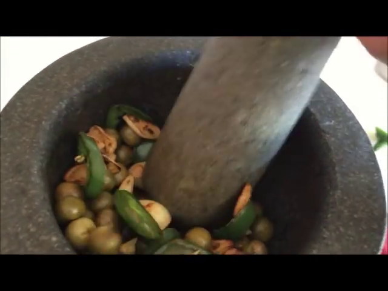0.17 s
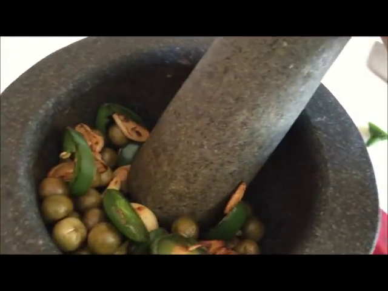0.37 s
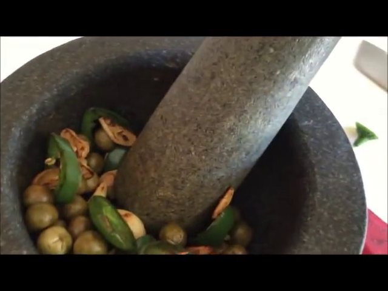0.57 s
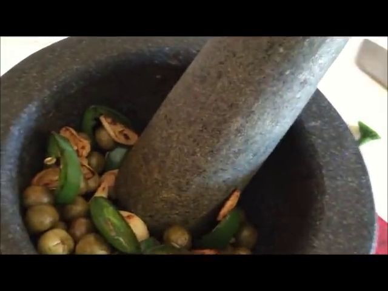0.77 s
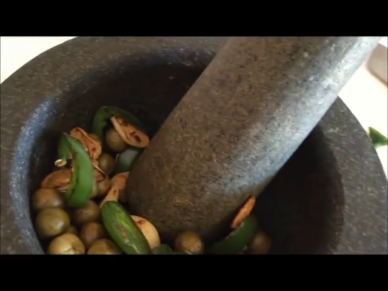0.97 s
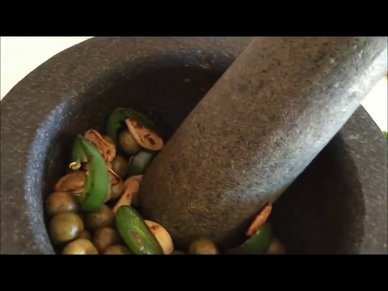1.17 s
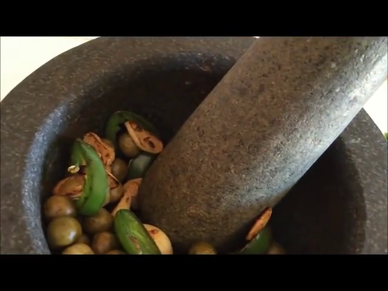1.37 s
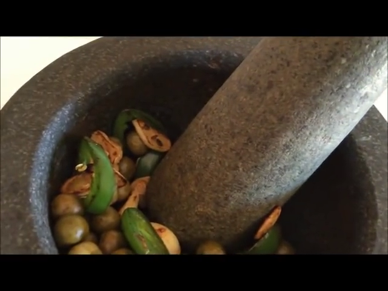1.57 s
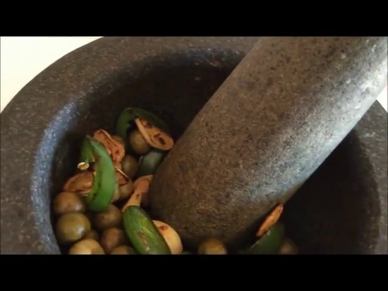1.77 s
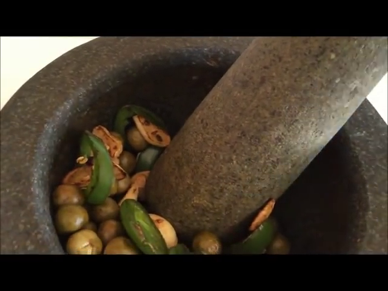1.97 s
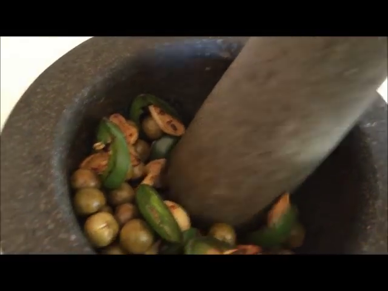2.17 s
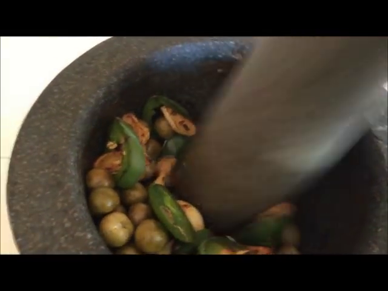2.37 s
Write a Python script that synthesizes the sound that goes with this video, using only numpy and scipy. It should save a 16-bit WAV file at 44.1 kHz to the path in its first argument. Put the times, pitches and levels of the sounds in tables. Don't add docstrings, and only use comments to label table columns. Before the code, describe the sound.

Stone pestle pounding in a mortar: crunching burst, sharp stone knock, quiet pause, faint wet scrape

```python
import sys
import numpy as np
from scipy import signal
from scipy.io import wavfile

SR = 44100
rng = np.random.default_rng(int(sys.argv[2]) if len(sys.argv) > 2 else 0)


def level_to_linear(level):
    exponent = np.asarray(level, float) / 20
    return 10 ** exponent


def file_out(sig):
    cols = np.atleast_2d(sig).T
    lim = np.clip(cols, -1, 1)
    pcm = np.round(lim * 32767).astype(np.int16)
    wavfile.write(sys.argv[1], SR, pcm)


N = 105840
BURST_S = .2243


def along(rows, col, at):
    rows = np.array(rows)
    return np.interp(np.log(at), np.log(rows[:, 0]), rows[:, col])


def rms_one(x):
    return x / np.sqrt(np.mean(x ** 2) + 1e-20)


def ring(x, hz, t60):
    r = level_to_linear(-60 / (t60 * SR))
    w = 2 * np.pi * hz / SR
    return signal.lfilter([0, np.sin(w)], [1, -2 * r * np.cos(w), r * r], x + 1e-18)


def t60_of(width_hz):
    return np.log(1000) / np.pi / width_hz


def resonance(x, hz, width_hz):
    return rms_one(ring(x, hz, t60_of(width_hz)))


def band_pass(x, lo_hz, hi_hz):
    return signal.sosfilt(signal.butter(2, [lo_hz, hi_hz], "band", fs=SR, output="sos"), x)


def high_pass(x, hz, order):
    return signal.sosfilt(signal.butter(order, hz, "high", fs=SR, output="sos"), x)


def colour(x, spectrum):
    edges = np.geomspace(max(spectrum[0][0], 30), 16000, 21)
    total = 0
    for k, (lo, hi) in enumerate(zip(edges, edges[1:])):
        gain = level_to_linear(along(spectrum, 1, np.sqrt(lo * hi)))
        total = total + gain * band_pass(x, lo, hi) * (-1) ** k
    return rms_one(total)


def grains(per_s, spread_db):
    hits = rng.random(N) < per_s / SR
    size = level_to_linear(spread_db * np.minimum(rng.exponential(1, N), 5))
    return hits * size * rng.choice([-1, 1], N)


def drift(per_s):
    r = np.exp(-2 * np.pi * per_s / SR)
    return rms_one(signal.lfilter([1], [1, -2 * r, r * r], rng.standard_normal(N + SR))[SR:])


def knocks():
    # time of the widest swing in seconds, peak in dB, pitch in Hz, share feeding the damped
    contacts = [(.049, -52, 1902, .3, 0.82), (0.0544, -49, 1500, .4, 0.64), (.192, -46.5, 1891, 0.85, .8),
                (0.221, -15, 1903, .3, .7), (0.2257, -26.5, 330, .02, .75), (.2248, -6.5, 1999, 0.4, 0.67),
                (.235, -20.5, 2100, .3, 0.67), (0.2444, -22.5, 1850, .9, 1), (0.3923, -2, 1850, 0.85, 0.82),
                (.403, -19.5, 1800, 0.4, 0.75), (.409, -7.5, 1496, 0.22, .65), (0.419, -9, 1450, 0.12, 0.6),
                (0.426, -10.5, 1450, 0.4, 0.61), (0.431, -22, 1101, 0.3, 0.59),
                (2.3237, -37, 1850, 0.34, .85)]
    # pitch in Hz, level in dB, t60 in seconds.
    bowl_tones = [(350, -7.5, 0.066), (620, -19.5, .015), (870, -29.5, 0.018), (1045, -15.5, 0.04),
                  (1170, -14.5, 0.019), (1460, -25, 0.014), (1640, -22.5, 0.022), (1760, -14, .011),
                  (1906, -4, 0.013), (2168, -15, .012)]
    # pitch in Hz, level in dB, t60 in seconds.
    pestle = [(2900, -31.5, 0.0081), (4484, -34, .02), (5278, -34.5, 0.018), (9440, -46, 0.03)]
    t = np.arange(N) / SR
    bowl, tick = np.zeros(N), np.zeros(N)
    for s, db, hz, share, swings in contacts:
        cycles = (t - s) * hz
        pulse = -level_to_linear(db) * np.exp(-(cycles / swings) ** 2) * np.cos(2 * np.pi * cycles)
        tone_ring = sum(level_to_linear(mode_db - 15.5) * ring(pulse, f, t60) for f, mode_db, t60 in bowl_tones)
        bowl += pulse + share * tone_ring
        tick[int(s * SR)] = level_to_linear(db)
    chime = 0
    for f, mode_db, t60 in pestle:
        soft_tap = np.hanning(32) * np.cos(2 * np.pi * f * np.arange(32) / SR)
        chime = chime + level_to_linear(mode_db - 15) * ring(np.convolve(tick, soft_tap, "same"), f, t60)
    return bowl, chime


def crush():
    # frequency in Hz, level in dB per Hz.
    shard_colour = [(290, -60), (500, -30), (1060, -5.5), (2230, 2), (2690, -10.5), (3680, 2.5),
                    (4250, -11.5), (5920, 0.5), (15500, -37.5)]
    # pitch in Hz, width in Hz, level in dB.
    wall_modes = [(1050, 95, 0.5), (1840, 130, 2), (2200, 87, 1.5), (3000, 180, -5.5), (3280, 94, -4.5),
                  (3900, 410, -7), (5290, 110, -9), (5870, 120, -2.5), (6740, 100, -2.5), (7840, 96, -6.5),
                  (9930, 130, -17), (12000, 900, -19.5), (13800, 210, -19), (14400, 130, -17)]
    build_db_per_s, build_from_s, settle_db_per_s = 1500, .206, 1120
    shards_per_s, shard_spread_db = 14000, 3.5
    t = np.arange(N) / SR - BURST_S

    build_db = build_db_per_s * np.minimum(t, 0) - 6 * settle_db_per_s * np.maximum(t, 0)
    build = level_to_linear(np.maximum(build_db, -200)) * (t > build_from_s - BURST_S)
    after = np.clip(t, 0, .2)
    first_split = level_to_linear(6 - 4998 * after)
    settle = (level_to_linear(-settle_db_per_s * after) + first_split) * (t > 0) * (t < .2)

    squeak_grains = grains(shards_per_s, shard_spread_db)
    squeak = level_to_linear(-17) * build * resonance(squeak_grains, hz=3050, width_hz=260)
    force = level_to_linear(-6 - 6.5) * (settle + .12 * build * (t <= 0))
    shards = grains(shards_per_s, shard_spread_db)
    wall_ring = sum(level_to_linear(db) * width_hz * ring(force * shards, hz, t60_of(width_hz))
                for hz, width_hz, db in wall_modes)
    wall_ring = high_pass(wall_ring, 800, 3)
    return squeak + force * colour(shards, shard_colour) + level_to_linear(-6.5 - 60) * wall_ring


def snaps():
    # start in seconds, peak in dB, pitch in Hz.
    splits = [(.0035, -33, 6700), (.0037, -36, 2260), (.0038, -47, 11400), (.009, -42, 7000),
              (0.012, -38, 6800), (.0122, -42, 2100), (.015, -40, 5500), (.020, -37.5, 2100),
              (0.0194, -42, 5500), (.0235, -47, 7000), (0.0243, -41.5, 2100), (.066, -45, 13190),
              (.0735, -55, 6500), (.0737, -52, 13000), (.043, -55, 9000), (.084, -50, 13700),
              (0.121, -57, 2500), (0.1235, -57, 3500), (0.1307, -59, 12490), (.136, -58.5, 11500),
              (.146, -61, 2500), (0.164, -56, 5940), (0.1638, -58, 2300), (0.175, -50, 6100),
              (0.175, -51, 1999), (.189, -57, 5700), (0.201, -27, 6000), (.2011, -28.5, 4200),
              (0.2011, -31, 2200), (0.2245, -17, 6000), (0.224, -14, 12290), (0.2128, -32, 6497),
              (.229, -17, 5814), (.235, -17, 7500), (.2385, -24, 3300), (0.3919, -19, 4720),
              (1.66, -60.5, 6500), (1.6601, -62, 12000), (2.1845, -49, 2600), (2.1965, -51, 2400),
              (2.197, -50, 8000), (2.212, -47, 2400), (2.2302, -40.5, 2400), (2.237, -46, 11000),
              (2.264, -52, 5000), (2.272, -41.5, 2600), (2.2722, -47, 5500), (2.2795, -44.5, 2600),
              (2.2794, -48, 9500), (2.294, -45.5, 3200), (2.304, -48, 12500), (2.31, -50, 3000),
              (2.319, -44, 2320), (2.322, -45.5, 6500), (2.331, -41.5, 3300), (2.337, -48.5, 4000),
              (2.357, -53, 2300), (2.3574, -51.5, 8000), (2.3574, -53.5, 14000)]
    ring_cycles, noise_share = 4.5, .3
    out = np.zeros(N + SR)
    puffs = rng.standard_normal((len(splits), 16))
    k = np.arange(16)
    for (s, db, hz), puff in zip(splits, puffs):
        push = np.hanning(16) * (np.cos(2 * np.pi * hz * k / SR) + noise_share * puff)
        edge = np.diff(np.r_[0, push, np.zeros(400)])
        snap = ring(edge, hz, ring_cycles / hz + 0.00089)
        out[int(s * SR):][:len(snap)] += level_to_linear(db) * snap / np.abs(snap).max()
    return out[:N]


def drag():
    # time in seconds, level in dB, share rubbing the wall (0-1), wet hiss in dB.
    strokes = [
        [(0.0, -51.5, 0.4, -6), (0.025, -59, 0.6, -6), (0.048, -68, 0.7, -4), (0.07, -68.5, 0.4, 2),
         (0.148, -76.5, 0.66, -7), (0.19, -70.5, 0.5, -3), (0.198, -55, 0.3, -1), (.206, -52, .3, -3)],
        [(2.165, -88, 0.33, -1.5), (2.192, -61, 0.3, 4), (2.214, -54, 0.15, 4), (2.239, -55.5, 0, 4.5),
         (2.246, -62.5, .2, 0), (2.258, -69, 0.3, 1)],
        [(2.258, -69, 0.3, -3), (2.275, -59, 0.2, -0.5), (2.30, -58, 0.37, 0), (2.326, -57.5, 0.32, -4.5),
         (2.355, -63.5, 0.5, -1), (2.366, -76.5, .3, -2), (2.4, -84, 0.35, -2.5)],
    ]
    # frequency in Hz, level in dB per Hz.
    grit_colour = [(530, -39.5), (900, -19), (2000, 0), (2860, -5.5), (4600, -9.5), (5500, -3),
                   (10300, -9.5), (11600, -5), (15500, -10)]
    t = np.arange(N) / SR
    grit = grains(per_s=22000, spread_db=2.2)
    body = colour(grit, grit_colour)
    wall_rub = resonance(grit, hz=1850, width_hz=760)
    wet = high_pass(body, 9700, 2)
    out = 0
    for rows in strokes:
        s, *columns = np.transpose(rows)
        db, rub, wet_db = [np.interp(t, s, c) for c in columns]
        moving = (t >= s[0]) * (t < s[-1])
        out = out + moving * level_to_linear(db) * (body + (level_to_linear(wet_db) - 1) * wet + 1.3 * rub * wall_rub)
    patches_db = 1.5 + 1.2 * drift(150)
    return out * level_to_linear(patches_db)


def sizzle():
    # lower edge in Hz, upper edge in Hz, level in dB, fade in dB per second.
    fizz_bands = [(1500, 2350, -43.5, 70), (2350, 5300, -40.5, 61), (5500, 9300, -41.5, 94.5),
                  (10500, 14800, -50, 135)]
    dry_up_s, dry_up_db_per_s = 0.33, 88
    t = np.arange(N) / SR - BURST_S
    onset_db = 1100 * np.minimum(t, 0)
    dry_up_db = dry_up_db_per_s * np.maximum(t - dry_up_s, 0)
    out = 0
    for lo_hz, hi_hz, db, fade_db in fizz_bands:
        bubbles = signal.lfilter([1, -1], [1, -.7], grains(22000, 3.2))
        level_db = db - fade_db * np.maximum(t, 0) - dry_up_db + onset_db
        out = out + level_to_linear(level_db) * rms_one(band_pass(bubbles, lo_hz, hi_hz))
    return out


def thumps():
    # time of the widest swing in seconds, level in dB, pitch in Hz, swell in seconds.
    sways = [(.005, -53.5, 42.3, 0.099), (.005, -44.5, 105, 0.019), (0.089, -49.5, 104, .015),
             (0.254, -26.5, 92, .012), (0.314, -43, 102, 0.026), (0.346, -52, 50.5, 0.039),
             (0.409, -37, 110, 0.02), (0.433, -29.5, 108, 0.016), (0.494, -44, 105.5, 0.025),
             (0.559, -48.5, 65.77, .02), (.73, -57, 107, 0.019), (0.799, -55, 92, .014),
             (.91, -56, 48, .03), (0.939, -57, 110, 0.0406), (1.345, -55, 115.8, 0.0133),
             (1.781, -59, 104.7, 0.014), (2.13, -57, 100, 0.024), (2.241, -53, 51, 0.0226)]
    t = np.arange(N) / SR
    return sum(level_to_linear(db) * np.exp(-((t - s) / swell) ** 2) * -np.cos(2 * np.pi * hz * (t - s))
               for s, db, hz, swell in sways)


def kitchen(x):
    # frequency in Hz, t60 in seconds, level in dB.
    echo_bands = [(497.4, 0.32, -32), (1150, 0.77, -37.5), (1800, 0.64, -39), (2599, 0.65, -33.5),
                  (4000, 0.58, -34.5), (7000, 0.65, -35.5), (9908, 0.26, -33.5), (14500, .22, -32.5)]
    early_t60_s, early_db, early_rise_s = 0.089, 12, 0.021
    t = np.arange(SR) / SR
    early = level_to_linear(early_db - 60 * t / early_t60_s)
    edges, echo = np.geomspace(150, 16500, 33), 0
    for lo, hi in zip(edges, edges[1:]):
        band = band_pass(rng.standard_normal(SR), lo, hi)
        hz = np.sqrt(lo * hi)
        late = level_to_linear(-60 * t / along(echo_bands, 1, hz))
        echo = echo + band * level_to_linear(along(echo_bands, 2, hz) - 14) * (late + early)
    return signal.fftconvolve(x, echo * np.clip(t / early_rise_s, 0, 1))[:N]


def hush():
    # frequency in Hz, level in dB per Hz.
    hiss_colour = [(15, -49), (25, -24), (107, -10), (241, -13), (299, -7.5), (402, -10.5), (619, -24),
                   (880, -17.5), (15800, -37)]
    # pitch in Hz, width in Hz, level in dB.
    boom_modes = [(48, 14, -92), (110, 13, -68.5), (193, 45, -72.5), (300, 22, -70), (378.3, 5, -72.5),
                  (610, 81, -80)]
    booms = 0
    for hz, width_hz, db in boom_modes:
        sway_db = 2.5 * drift(9.0)
        booms = booms + level_to_linear(db + sway_db) * resonance(rng.standard_normal(N + SR), hz, width_hz)[SR:]
    return level_to_linear(-64.5 - 6.5) * colour(rng.standard_normal(N + SR), hiss_colour)[SR:] + booms


def scene():
    bowl, chime = knocks()
    mortar = bowl + crush() + snaps() + drag()
    return (mortar + chime + sizzle() + kitchen(mortar) + thumps() + hush())[None]


def low_pass(x):
    return signal.sosfilt(signal.butter(12, 15920, fs=SR, output="sos"), x)


def record(dry):
    # time in seconds, gain in dB.
    gain = [
        (0.225, -3),
        (0.252, -5.5),
        (.3, -7),
        (0.393, -2.5),
        (.43, -3.5),
        (.55, -6),
        (0.619, 0.5),
        (0.751, -0.5),
        (.9, -1),
    ]
    clip = .5
    x = dry * level_to_linear(np.interp(np.arange(N) / SR, *np.transpose(gain)))
    x = (x + level_to_linear(-86.5) * rng.standard_normal(N)) / clip
    clipped = clip * x / (1 + x ** 6) ** (1 / 6)
    mix = signal.sosfilt(signal.cheby2(12, 70, 16350, fs=SR, output="sos"), clipped)
    return low_pass(mix)


dry = scene()
out = record(dry)
file_out(out)
```